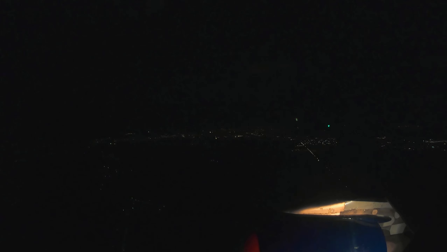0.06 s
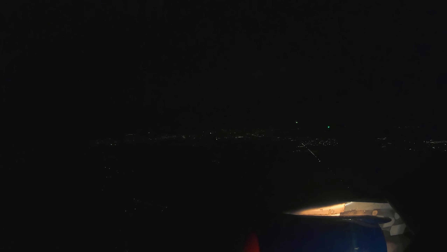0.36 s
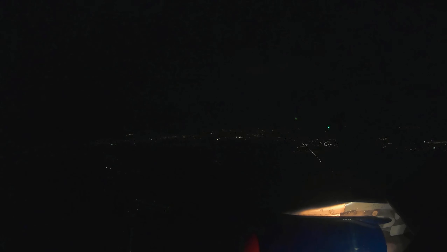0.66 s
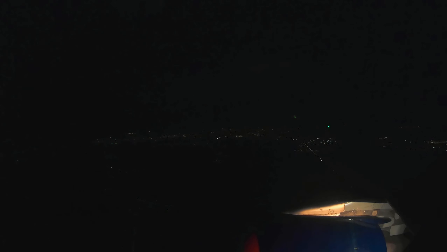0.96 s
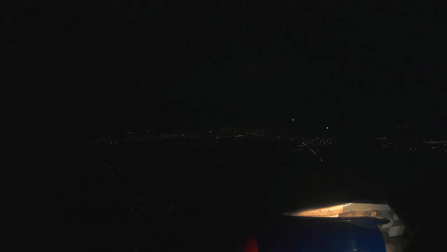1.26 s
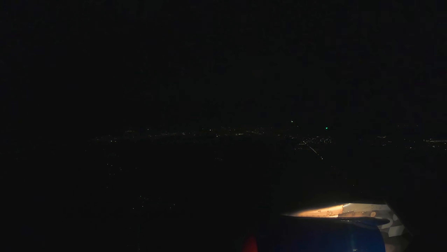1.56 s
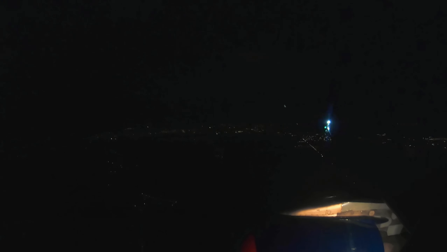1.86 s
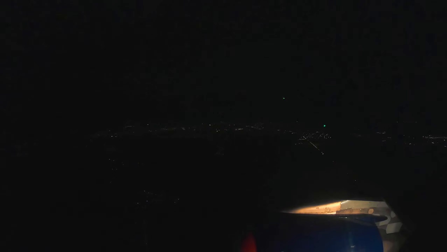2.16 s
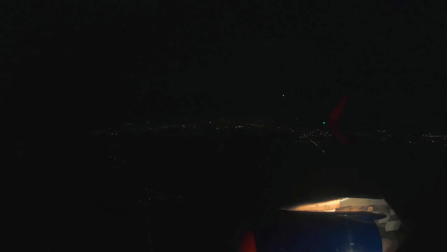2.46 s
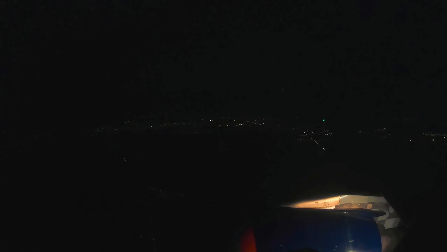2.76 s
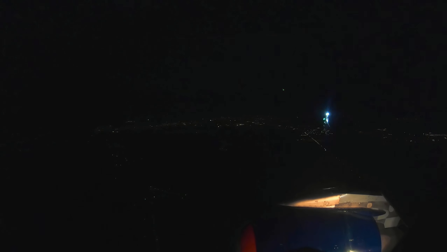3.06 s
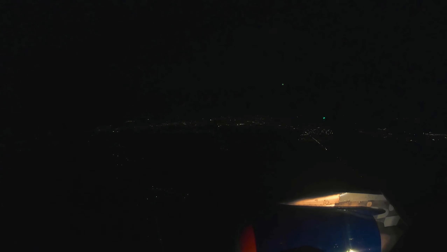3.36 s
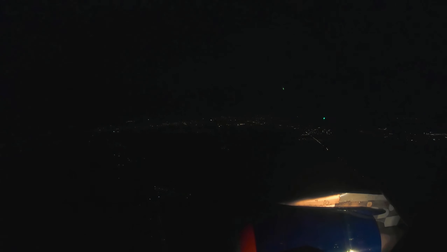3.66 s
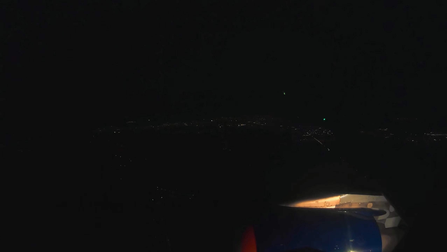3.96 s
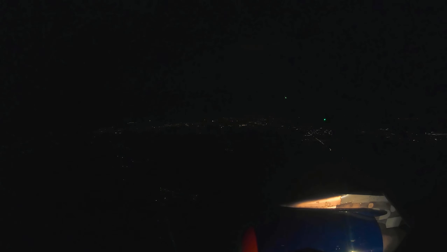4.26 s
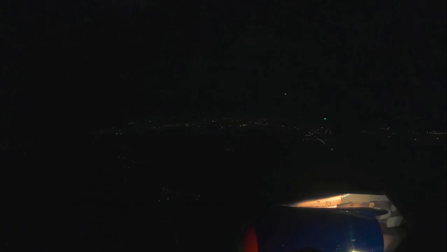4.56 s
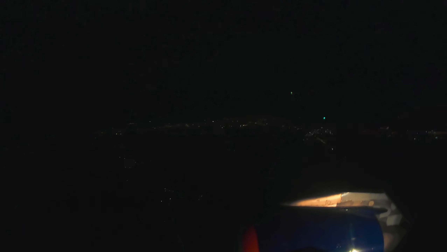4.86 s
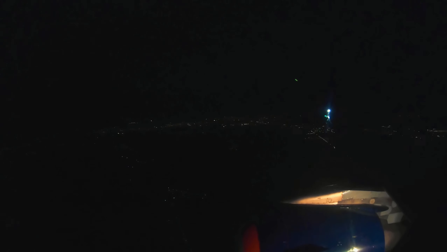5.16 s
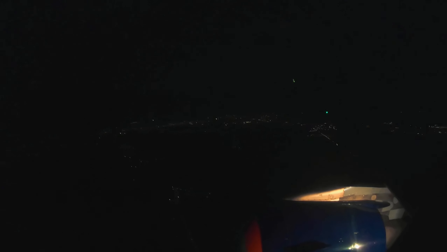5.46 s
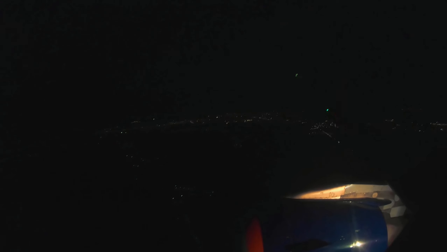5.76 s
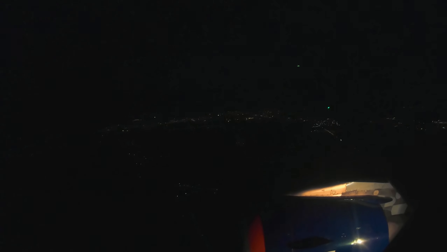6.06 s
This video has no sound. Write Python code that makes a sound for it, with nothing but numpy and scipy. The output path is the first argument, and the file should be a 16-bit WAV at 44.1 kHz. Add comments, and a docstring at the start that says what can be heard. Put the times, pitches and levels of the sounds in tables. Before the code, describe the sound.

Jet engines drone steadily with a throbbing, buzzy hum over low rumbling airflow, heard inside an airliner cabin in flight.

```python
"""A buzz-saw drone throbs over rumbling air: an airliner cabin at night, at a window beside a jet engine.
The fan's uneven blades sound a stack of shaft orders, the core hums at steady thrust, and a far
engine slightly out of step beats against both. Airflow rumbles and hisses through the fuselage.
Tones swell and fade as a hand-held microphone drifts through the cabin's standing waves,
and fingers shift a few times on its case."""
import sys
import numpy as np
from scipy import signal
from scipy.fft import rfft, irfft
from scipy.io import wavfile

SR = 44100
rng = np.random.default_rng(int(sys.argv[2]) if len(sys.argv) > 2 else 0)


def dump(signal):
    """Clip the signal to [-1, 1] and save it as 16-bit WAV at the path in sys.argv[1]."""
    limited = np.clip(np.atleast_2d(signal).T, -1, 1)
    pcm = np.round(limited * 32767).astype(np.int16)
    wavfile.write(sys.argv[1], SR, pcm)


N = 269892
TIME = np.arange(N) / SR
FAR_SHAFT_HZ = 73.228

# buzz-saw tones of the near fan: shaft order, level/dB rms
BUZZ_TONES = [(1, -32), (2, -41.4), (3, -33), (4, -41), (5, -46), (6, -51.1), (7, -39.4), (8, -55.8),
              (10, -50.2), (11, -44.3), (12, -57.6), (13, -55.1), (14, -55.3), (15, -53.4), (17, -65.2),
              (18, -63), (19, -51.4), (22, -49.3), (23, -55.1), (24, -57.7), (25, -52.8), (26, -60.4),
              (27, -57.3), (28, -57.8), (29, -63), (30, -76), (31, -63.3), (32, -60.8), (33, -62.1),
              (34, -72), (35, -64), (36, -53.8), (37, -71.6), (38, -70.1), (39, -64.5), (40, -68),
              (41, -75), (42, -74), (43, -61.5), (44, -70.5), (45, -87), (46, -68), (47, -76.5), (48, -72),
              (50, -74), (51, -69.8), (54, -71.5), (55, -78.5), (57, -80), (58, -80), (59, -84.5),
              (61, -85), (62, -87)]


def fans(usual_far_db=-16, wander_db=0.17, flutter_db=0.86):
    """The buzz-saw: each shaft order throbs against the far fan and swells or fades in standing waves."""
    # the near fan hunts a little above the far one: t/s, lead in shaft speed/Hz
    speed_lead = [(0, 0.0622), (1, 0.0925), (2, 0.0907), (3, 0.1092), (3.7, 0.075), (4.4, 0.115),
                  (5.2, 0.0766), (6.12, 0.0898)]
    # tones in which the far fan is strong: shaft order, crest t/s, far level against near/dB
    strong_beats = [(1, .25, -6), (3, 2.66, -4), (7, .74, -15.5), (8, 1.1, -9), (10, .68, -8.5),
                    (11, 0.61, -8), (12, .95, -6), (13, 0.24, -12.5), (14, .86, -12.5), (15, 0.49, -13.5),
                    (17, .58, -9.5), (18, 0.62, 0), (22, .32, -11.5), (29, 0.088, -9), (32, 0.083, -7.5),
                    (33, .01, -12), (36, 0.41, -7)]
    # the hand carries the microphone slowly along the window: t/s, place/cm
    mic_path = [(0, 0), (1.9, 0.24), (2.25, 2), (3.4, 2), (4.6, 2), (5.2, 3.5), (5.6, 4), (6.12, 4.5)]
    # tones that form standing waves: shaft order, loud spot/cm, reflected share/0-1
    standing_tones = [(10, -2, .6), (11, 2, .5), (13, 7, .4), (19, -0.6, .92), (22, 1.8, .6), (24, 5, .43),
                      (25, 7, 0.3), (26, -1.5, 0.5), (27, 3, 0.7), (28, -1.7, .53), (32, 3, 0.4),
                      (33, -1, 0.98), (35, 2.5, 0.1), (36, 0.5, 0.3), (38, 4, .93), (39, 3.5, 0.4),
                      (40, 1.3, 0.2), (43, 2.1, .95), (44, 3, 0.7), (46, 0.5, .52), (48, -0.5, .95),
                      (50, .4, .95), (51, 0.5, .95), (54, 2.5, .95)]
    lead_turns = np.cumsum(in_time(speed_lead)) / SR
    shaft_turns = FAR_SHAFT_HZ * TIME + lead_turns
    mic_cm = in_time(mic_path)
    beats = {round(order): rest for order, *rest in strong_beats}
    standing = {round(order): rest for order, *rest in standing_tones}
    buzz = np.zeros(N)
    for order, level_db in BUZZ_TONES:
        crest_s, far_db = beats.get(order, (rng.random() * N / SR, usual_far_db))
        loud_cm, reflected = standing.get(order, (0, 0))
        pair = throbbing(order * shaft_turns + shock_phase(order), order * lead_turns, crest_s, far_db)
        heard = rms_one(pair * standing_wave(order * FAR_SHAFT_HZ, mic_cm - loud_cm, reflected))
        # turbulence at the inlet makes each tone wander and flutter
        buzz += from_db(level_db + wander_db * drift(1.1) + flutter_db * drift(14)) * heard
    return buzz + fan_sizzle(shaft_turns)


def shock_phase(order, sweep_turns=.015, scatter_turns=.15):
    """Phase in turns: higher orders lag through the wall, smearing each blade shock into a rising chirp."""
    return -sweep_turns * order ** 2 + scatter_turns * rng.standard_normal()


def throbbing(turns, lead_turns, crest_s, far_db):
    """A tone beats with its twin from the far engine, which slips behind; they are in step at crest_s."""
    behind = lead_turns - np.interp(crest_s, TIME, lead_turns)
    return rms_one(tone(turns) + from_db(far_db) * tone(turns - behind))


def standing_wave(hz, offset_cm, reflected, sound_cm_per_s=34300):
    """Gain of a tone plus its reflection, offset_cm away from a loud spot."""
    return np.abs(1 + reflected * np.exp(4j * np.pi * hz * offset_cm / sound_cm_per_s))


def fan_sizzle(shaft_turns, uneven_db=3.0):
    """Weak, uneven high orders between and above the buzz-saw tones fall away towards the treble."""
    # mean strength of one weak order: f/Hz, level/dB rms
    rolloff = [(3000, -77), (3500, -84), (4200, -88), (4600, -89.5), (5100, -94), (6000, -99), (8500, -111)]
    orders = np.setdiff1d(np.arange(30, 117), [order for order, _ in BUZZ_TONES])
    levels_db = at_hz(rolloff, orders * FAR_SHAFT_HZ) + uneven_db * rng.standard_normal(len(orders))
    return sum(from_db(db) * tone(order * shaft_turns + shock_phase(order))
               for order, db in zip(orders, levels_db))


def core(hum_hz=236.25, wobble_hz=0.33, slip_hz=.33):
    """The cores' hum heaves slowly and grows, fluttering at about 16 Hz against the fan's third order."""
    # swell of the hum: t/s, level/dB
    swell = [(0, -39), (1.6, -35.5), (2.3, -35), (3.3, -35), (4.9, -34), (5.55, -29.5), (6.12, -32.5)]
    turns = np.cumsum(hum_hz + wobble_hz * drift(4.5)) / SR
    return from_db(in_time(swell)) * throbbing(turns, slip_hz * TIME, crest_s=3.4, far_db=-8.5)


def fingers(tick_hz=13500, tick_s=.0009, soft_hz=3050, off_pitch_db_per_octave=-8.5):
    """Each touch knocks the case's modes, most near its own pitch; slipping skin adds a bright tick."""
    # fingers on the case: t/s, knock level/dB, contact pitch/Hz, tick level/dB
    touches = [(2.635, -35, 3300, -87), (2.6372, -20, 620, -84), (2.6385, -30, 2400, -82),
               (2.6405, -20.5, 1000, -73), (2.6478, -33, 3700, -79), (2.651, -30, 1250, -89),
               (4.8805, -33, 2700, -80), (4.883, -28, 1300, -76), (4.8855, -43, 7000, -75),
               (5.400, -42, 3500, -64), (5.458, -38, 3500, -69), (5.790, -32, 3600, -83),
               (5.7943, -28, 3450, -45.5), (5.7995, -31.5, 3400, -75)]
    # ringing modes of the case: f/Hz, level/dB, t60/s
    case_modes = [(452, 4, 0.028), (560, -1.5, 0.015), (789, -1, 0.051), (1350, -1.5, 0.03),
                  (1870, -6, 0.046), (2400, -9.5, 0.012), (3190, -7, 0.035), (3500, -12.5, 0.04),
                  (3760, -11.5, 0.069), (3900, -18, 0.04), (4280, -22.5, 0.05), (4540, -19, 0.041),
                  (7400, -14.5, .02), (7950, -14, .02)]
    times, knock_db, contact_hz, tick_db = np.transpose(touches)
    onsets = np.round(times * SR).astype(int)
    body = np.zeros(N)
    for hz, mode_db, t60 in case_modes:
        octaves_off = np.abs(np.log2(hz / contact_hz))
        knocks = np.zeros(N)
        knocks[onsets] = from_db(knock_db + mode_db + off_pitch_db_per_octave * octaves_off)
        body += ring(knocks, hz, t60)
    scuffs = sum(scuff(s, db, hz) for s, db, hz in zip(times, knock_db, contact_hz))
    soft = signal.sosfilt(signal.butter(2, soft_hz, fs=SR, output="sos"), body + scuffs)  # flesh is soft
    slips = sum(from_db(db) * np.exp(-np.abs(TIME - s) / tick_s) for s, db in zip(times, tick_db))
    tick_band = signal.butter(4, [.87 * tick_hz, 1.17 * tick_hz], "band", fs=SR, output="sos")
    return soft + signal.sosfilt(tick_band, slips * rng.standard_normal(N))


def scuff(at_s, knock_db, contact_hz, rub_db=-20, fade_s=0.0042, width_octaves=0.8):
    """Skin rubs over the case around a knock, in a band about the pitch of the contact."""
    rub = from_db(knock_db + rub_db) * np.exp(-np.abs(TIME - at_s) / fade_s)
    edges_hz = contact_hz * 2 ** (width_octaves * np.array([-.5, .5]))
    band = signal.butter(2, edges_hz, "band", fs=SR, output="sos")
    return signal.sosfilt(band, (rub + 1e-18) * rng.standard_normal(N))


def airflow(rumble_top_hz=1200):
    """A bed of turbulence on the fuselage: the wall lets rumble in, dulls hiss and rings in its panels."""
    # rumble of airflow and exhaust through the wall: f/Hz, level/dB per Hz
    rumble_spectrum = [(10, -65), (30, -61), (46, -47.5), (62, -48.5), (72, -52.5), (86, -50.5),
                       (105, -50.5), (130, -55), (195, -55), (225, -56.5), (260, -54.5), (290, -56),
                       (312, -61), (345, -61), (385, -71), (505, -65), (620, -76), (790, -72.5), (950, -84)]
    # hiss of the air through the wall: f/Hz, level/dB per Hz
    hiss_spectrum = [(600, -90.5), (950, -82.5), (1100, -80.5), (1200, -86.5), (1900, -81.5), (2400, -86.5),
                     (2900, -88), (3100, -92), (3700, -98), (4100, -104), (4700, -104.5), (5150, -112.5),
                     (7700, -119.5), (9500, -129), (12500, -130), (15500, -136)]
    # wall panels that ring in the hiss: f/Hz, width/Hz, boost/dB
    panels = [(1340, 210, 4.5), (1656, 240, 4), (1860, 650, 1), (2657, 66, 5), (3340, 75, 2),
              (3730, 800, 4), (4230, 86, 9), (4570, 160, 3)]
    hz = np.fft.rfftfreq(N, 1 / SR)
    panels_db = sum(db / (1 + (2 * (hz - centre) / width) ** 2) for centre, width, db in panels)
    rumble = from_db(at_hz(rumble_spectrum, hz)) / np.sqrt(1 + (hz / rumble_top_hz) ** 12)
    hiss = from_db(at_hz(hiss_spectrum, hz) + panels_db)
    return irfft(rfft(rng.standard_normal(N)) * np.hypot(rumble, hiss), N) * np.sqrt(SR / 2)


def from_db(db):
    """Decibels to gain."""
    return 10 ** (np.asarray(db) / 20)


def rms_one(x):
    """Scale to rms 1."""
    return x / np.sqrt(np.mean(x ** 2) + 1e-20)


def in_time(points):
    """A breakpoint curve, sample by sample."""
    return np.interp(TIME, *np.transpose(points))


def at_hz(points, hz):
    """Read a spectrum on a log-frequency axis."""
    known_hz, level = np.transpose(points)
    return np.interp(np.log(hz + 1e-9), np.log(known_hz), level)


def drift(rate):
    """Glide between random values of spread 1, `rate` of them a second."""
    knots = rng.standard_normal(int(N / SR * rate) + 2)
    return np.interp(TIME * rate, np.arange(len(knots)), knots)


def tone(turns):
    """A sine of rms 1 that follows a count of turns."""
    return np.sqrt(2) * np.sin(2 * np.pi * turns)


def ring(clicks, hz, t60):
    """A unit click sets a sine of height 1 ringing."""
    decay = np.exp(-np.log(1000) / (t60 * SR))
    step = 2 * np.pi * hz / SR
    return signal.lfilter([0, np.sin(step)], [1, -2 * decay * np.cos(step), decay ** 2], clicks + 1e-18)


def scene():
    """Engines and airflow fill the cabin; the touches are right at the microphone."""
    return (fans() + core() + airflow() + fingers())[None]


def record(dry):
    """The grip shifts and shades the microphone port, notching the treble; the very top is cut off."""
    grip_s, move_s = 4.88, 0.03
    notch_hz, width_hz, notch_db, cutoff_hz = 3670, 1000, -9, 16400
    shaded_band = signal.filtfilt(*signal.iirpeak(notch_hz, notch_hz / width_hz, fs=SR), dry)
    covered = np.clip((TIME - grip_s) / move_s, 0, 1)
    heard = dry + (from_db(notch_db * covered) - 1) * shaded_band
    soft_ends = signal.windows.tukey(N, .0012)
    return signal.sosfilt(signal.cheby2(12, 70, cutoff_hz, fs=SR, output="sos"), heard * soft_ends)


dry = scene()
out = record(dry)
dump(out)
```